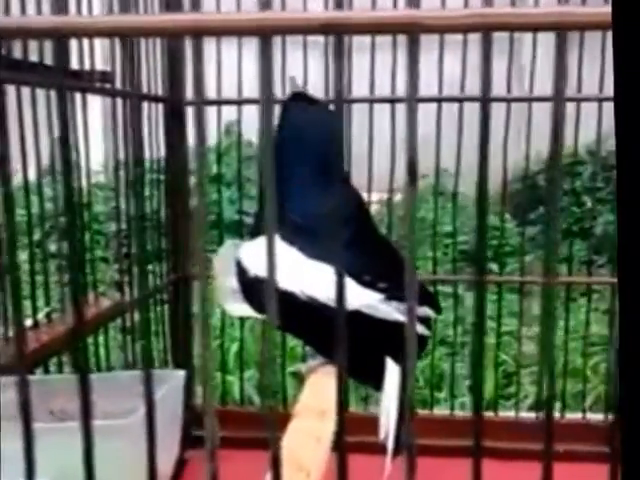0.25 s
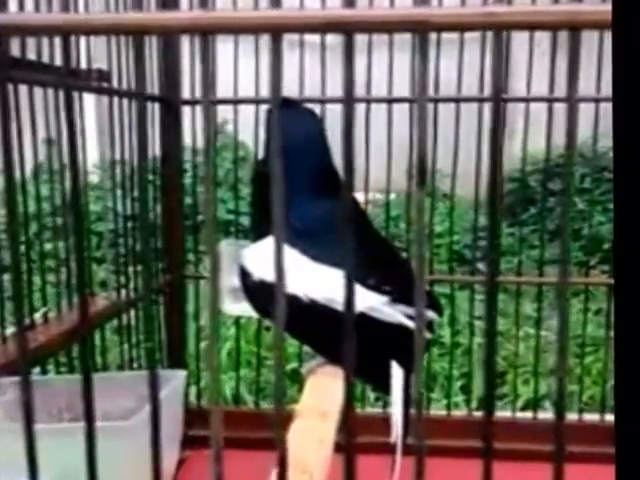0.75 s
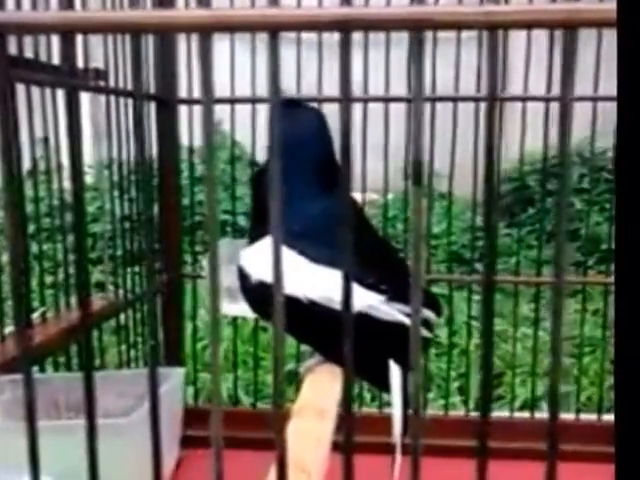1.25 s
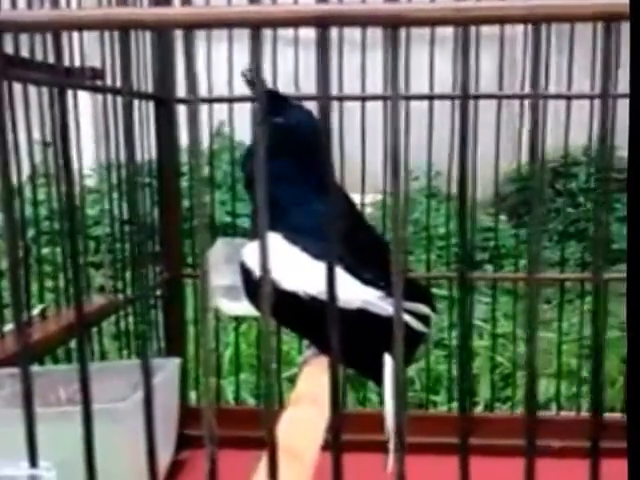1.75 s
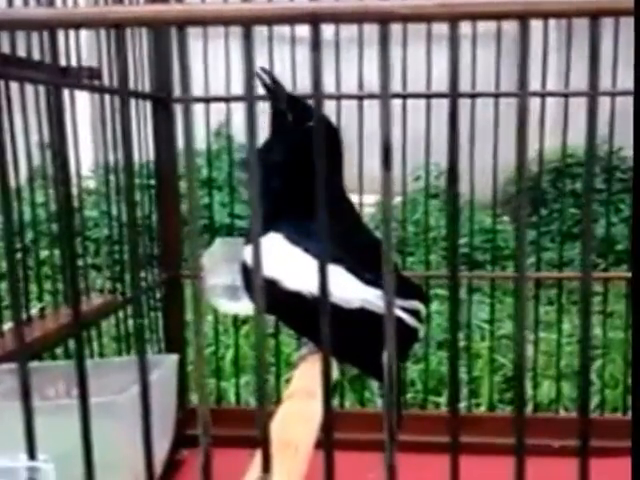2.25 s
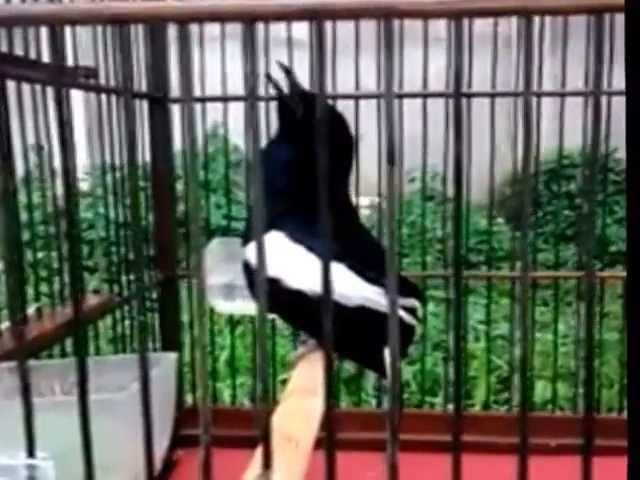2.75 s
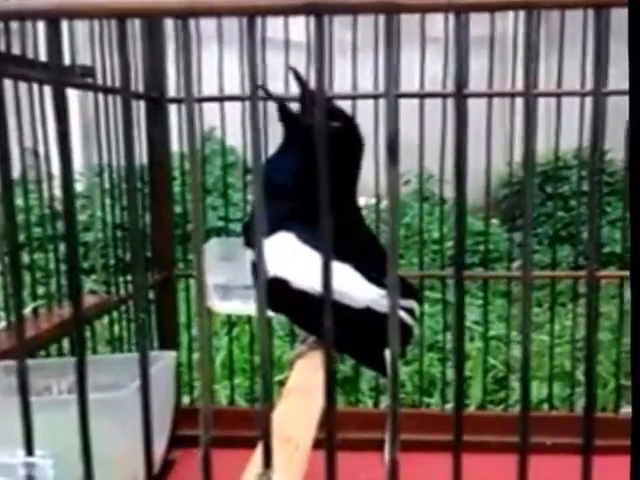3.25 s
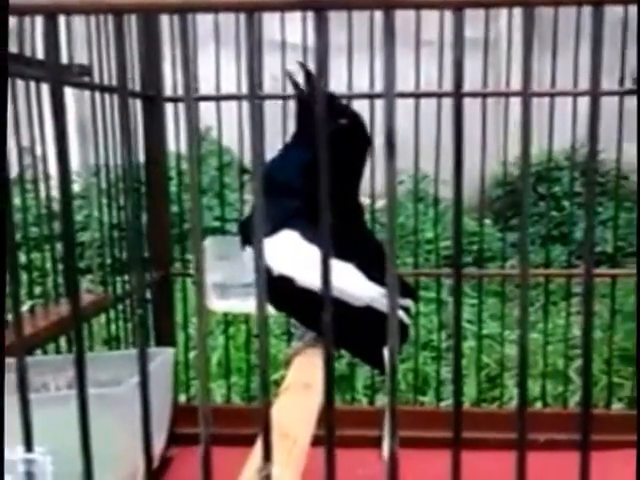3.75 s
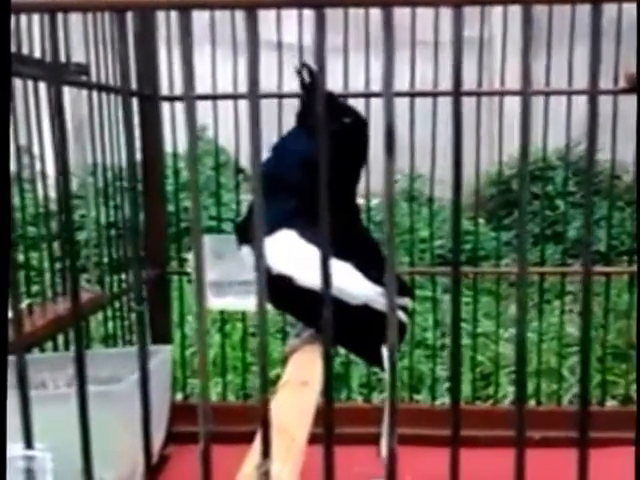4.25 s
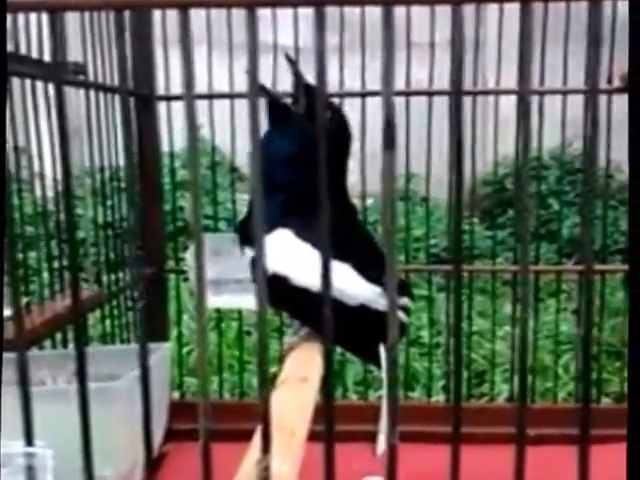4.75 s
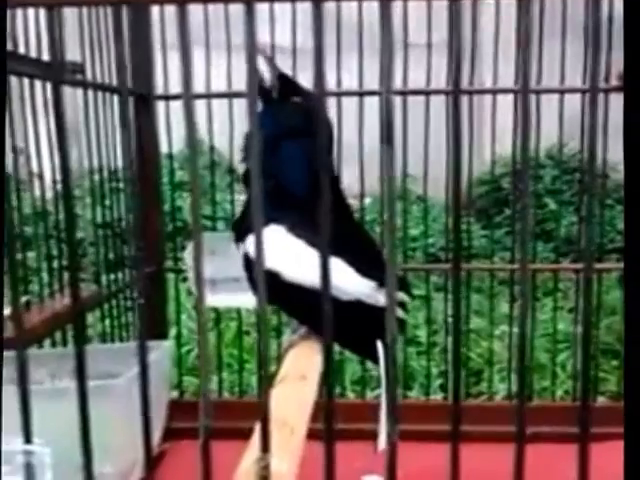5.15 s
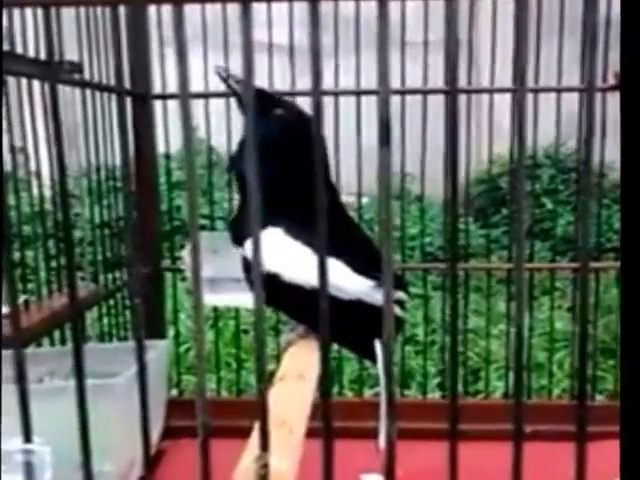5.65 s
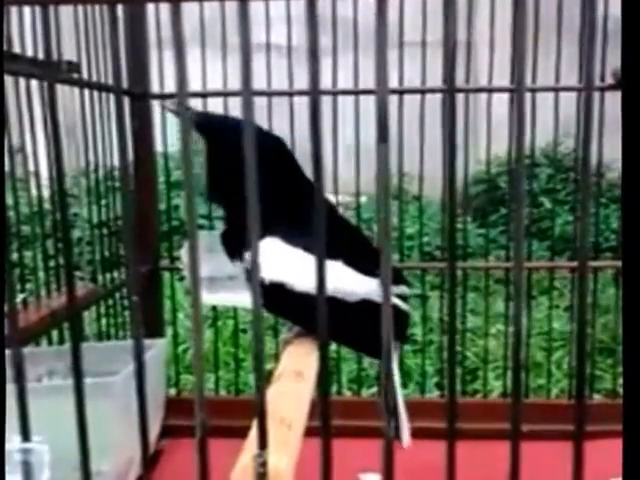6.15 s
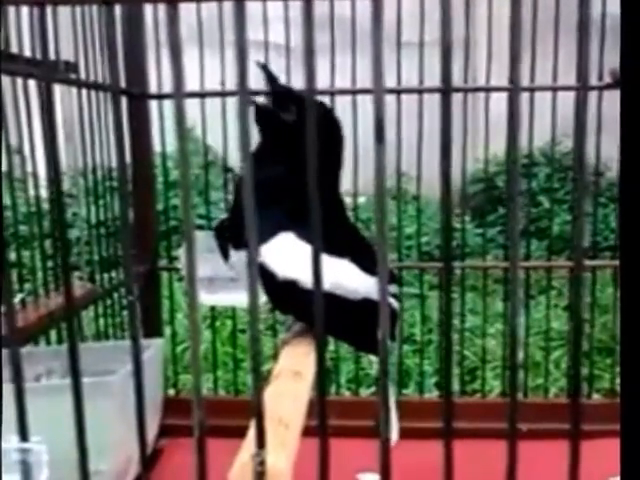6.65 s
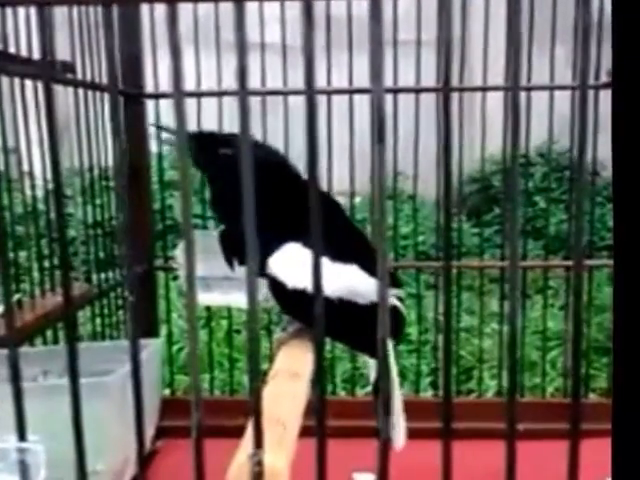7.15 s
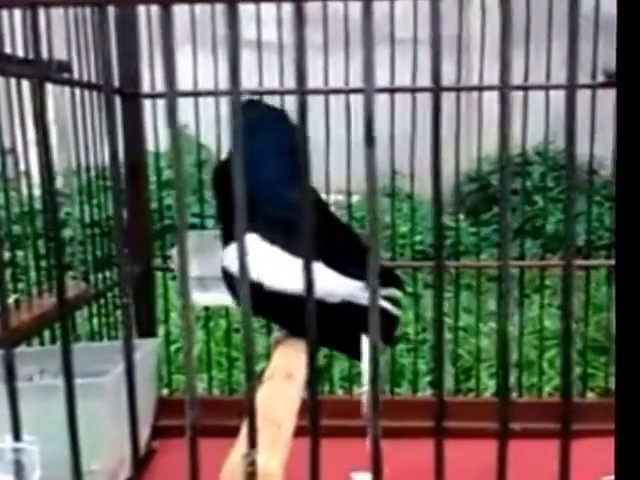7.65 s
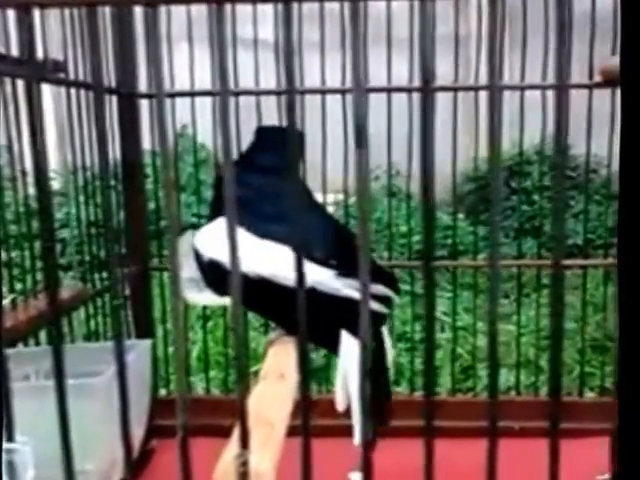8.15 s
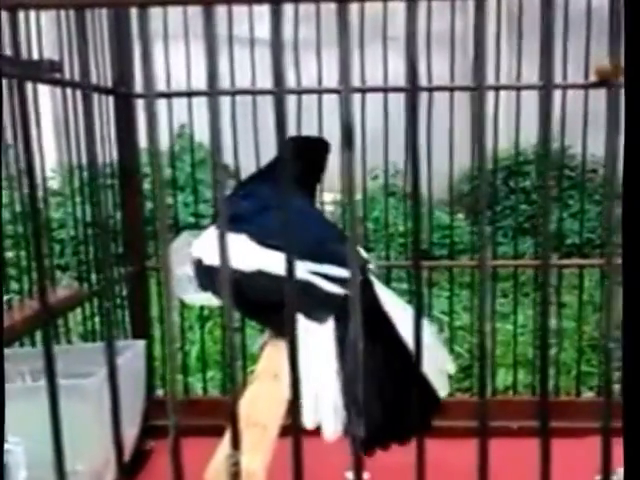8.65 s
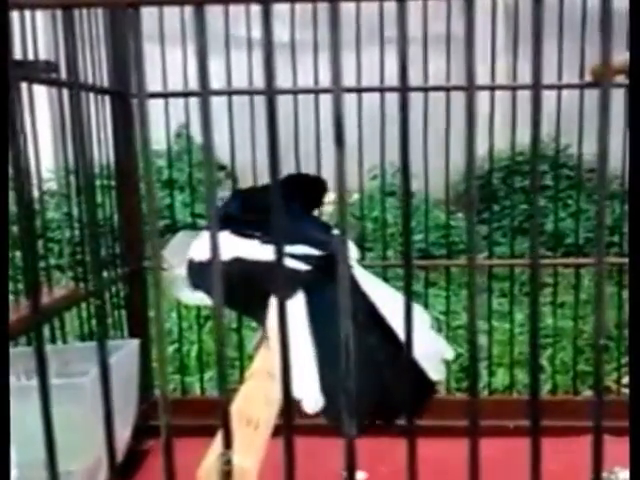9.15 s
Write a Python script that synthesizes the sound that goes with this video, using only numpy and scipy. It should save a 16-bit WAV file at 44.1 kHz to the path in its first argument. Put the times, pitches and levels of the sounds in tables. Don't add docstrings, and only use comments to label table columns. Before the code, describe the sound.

A caged songbird sings close by: clear whistles, tumbling cries, harsh chatter and quick trills, over pulsing spray hiss and faint low rumble.

```python
import sys
import numpy as np
from scipy import signal
from scipy.fft import rfft, irfft, next_fast_len
from scipy.io import wavfile
from scipy.ndimage import uniform_filter1d

SR = 44100
rng = np.random.default_rng(int(sys.argv[2]) if len(sys.argv) > 2 else 0)


def ratio(d):
    e = np.asarray(d, float) / 20
    return 10 ** e


def wav_out(sig):
    wavfile.write(sys.argv[1], SR, np.round(np.clip(np.atleast_2d(sig).T, -1, 1) * 32767).astype(np.int16))


N = 414981


def evened(x):
    return x / np.sqrt(np.mean(x ** 2) + 1e-20)


def read(points, hz):
    f, value = np.transpose(points)
    return np.interp(np.log(hz + 1), np.log(f + 1), value)


def add(mix, s, sound):
    part = mix[round(s * SR):][:len(sound)]
    part += sound[:len(part)]


def soft_edges(count, rise, fall):
    t = np.arange(count) / SR
    ramp = np.minimum(t / rise, t[::-1] / fall)
    return np.sin(np.pi / 2 * np.clip(ramp, 0, 1)) ** 2


def flutter(count, width_hz):
    settle = 500
    z = rng.standard_normal((count + settle, 2)) @ [1, 1j]
    z = signal.lfilter(*signal.butter(N=3, Wn=width_hz / SR), z)[settle:]
    return z / np.sqrt(np.mean(abs(z) ** 2))


def coloured(points):
    count = next_fast_len(N)
    spectrum = rfft(rng.standard_normal(count))
    colour = ratio(read(points, np.fft.rfftfreq(count, 1 / SR)))
    return evened(irfft(spectrum * colour, count)[:N])


# (frequency [Hz], gain [dB])
THROAT_GAIN = [(800, -36.5), (1800, 1.5), (3000, 5), (6000, -0.5), (14000, 6.5)]


def syrinx(hz, rough, width_hz):
    rough = np.clip(rough, 0, 1)
    turns = np.cumsum(hz) / SR
    out = 0
    for k, db in [(1, 0), (2, -33)]:  # (multiple of the pitch, dB)
        share = rough if k == 1 else np.maximum(rough, .75)
        steady = np.sqrt(1 - share)
        unsteady = np.sqrt(share) * flutter(len(hz), np.sqrt(k) * width_hz)
        throat_db = read(THROAT_GAIN, k * hz) - read(THROAT_GAIN, hz)
        rough_db = (k > 1) * 13 * rough
        colour = ratio(db + rough_db + throat_db) * (k * hz < 11700)
        out = out + colour * ((steady + unsteady) * np.exp(2j * np.pi * k * turns)).real
    return np.sqrt(2) * out


# (start [s], end [s], rate [per s], depth [share of pitch])
WARBLE_SPANS = [
    (1.733, 1.97, 37, 0.017),
    (5.508, 5.78, 36, 0.096),
]
# (start [s], end [s], least roughness [0-1], flutter width [Hz])
BUZZY_SPANS = [(1.72, 1.97, .65, 500), (3.46, 3.61, .85, 950), (4.03, 4.12, .85, 900),
               (5.39, 5.54, .3, 350), (7.25, 7.33, .3, 350), (5.54, 5.8, .55, 450), (6.905, 7.02, .6, 600),
               (4.22, 4.38, .12, 700), (7.95, 8.09, .08, 600), (2.3, 2.4, .1, 700), (7.63, 7.67, .5, 700),
               (7.76, 7.79, .4, 700), (8.33, 8.46, .2, 600)]


def note(rows):
    s, *columns = np.transpose(rows)
    t = np.arange(max(s[0] - .004, 0), s[-1] + 0.0083, 1 / SR)
    hz, db, rough = (np.interp(t, s, c) for c in columns)
    for start, end, rate, depth in WARBLE_SPANS:
        growth = np.clip((t - start) / 0.25, 0, 1) * (t < end + .1)
        hz = hz * (1 + depth * growth * np.sin(2 * np.pi * rate * t))
    sound = syrinx(hz, rough, np.clip(90 / (s[-1] - s[0]), 250, 800))
    for start, end, least, width_hz in BUZZY_SPANS:
        inside = uniform_filter1d(1. * (t > start) * (t < end), size=600)
        if inside.any():
            buzz = syrinx(hz, np.maximum(rough, least), width_hz)
            sound = np.sqrt(1 - inside) * sound + np.sqrt(inside) * buzz
    return t[0], ratio(db) * sound * soft_edges(len(t), 0.0047, 0.0044)


# (time [s], pitch [Hz], level [dB])
OPENING_SLURS = [
    [(.323, 2154, -30), (.343, 2171, -25), (.365, 2158, -25), (.387, 1894, -27), (.398, 1762, -34)],
    [(.556, 2990, -30), (.566, 2490, -18), (.574, 2400, -27), (.605, 2340, -25), (.645, 2537, -17.5),
     (.665, 2610, -20), (.685, 2590, -26), (.707, 2567, -25), (.721, 2553, -40)],
    [(.801, 2904, -26), (.808, 2520, -17), (.818, 2410, -23), (.852, 2297, -25), (.89, 2290, -33),
     (.97, 2251, -37), (1.042, 1949, -40), (1.198, 1727, -34), (1.268, 1755, -37), (1.332, 2122, -44)],
    [(0.925, 3136, -53), (0.979, 3265, -39), (1.031, 3200, -25), (1.059, 3147, -23), (1.081, 3042, -25),
     (1.119, 3011, -40), (1.245, 2815, -59), (1.319, 2934, -41), (1.35, 3043, -47)],
]
# (time [s], pitch [Hz], level [dB])
HELD_WHISTLES = [
    [(3.24, 2967, -39), (3.256, 2981, -25), (3.304, 3079, -25), (3.322, 2909, -29), (3.342, 2909, -30),
     (3.39, 3390, -36), (3.404, 2968, -34), (3.42, 3089, -45)],
    [(3.853, 2914, -33), (3.877, 2979, -22), (3.905, 2989, -24), (3.923, 2791, -29), (3.941, 2678, -27),
     (3.959, 2984, -28), (3.977, 2419, -38), (3.985, 2488, -41)],
    [(2.346, 3784, -20), (2.366, 3305, -19), (2.384, 2710, -25), (2.396, 2337, -34), (2.432, 1828, -41),
     (2.458, 1719, -40), (2.47, 1665, -46)],
    [(4.23, 2877, -47), (4.242, 3190, -33), (4.252, 3234, -35), (4.274, 2945, -34), (4.31, 2996, -39)],
    [(4.53, 1650, -28), (4.542, 2026, -22.5), (4.555, 2130, -25), (4.562, 2100, -31), (4.568, 2050, -24),
     (4.59, 1908, -33)],
    [(4.683, 3310, -26), (4.7, 3100, -23), (4.722, 2850, -30), (4.743, 2761, -25), (4.771, 2656, -27),
     (4.79, 2584, -38)],
    [(4.914, 3328, -40), (4.926, 3337, -30), (4.956, 3328, -19), (5.012, 3375, -20), (5.088, 3386, -27),
     (5.101, 3440, -38)],
    [(7.16, 3055, -23), (7.166, 3043, -19), (7.214, 3042, -19), (7.3, 2889, -31), (7.316, 2760, -37)],
]
# (time [s], pitch [Hz], level [dB])
VOICE_STRANDS = [
    [(4.264, 4600, -33), (4.29, 4350, -35), (4.316, 4115, -30), (4.322, 4156, -33)],
    [(4.32, 3265, -44), (4.33, 3322, -34), (4.35, 3657, -32), (4.36, 3715, -26), (4.377, 3628, -41)],
    [(4.669, 3798, -24), (4.681, 3783, -19), (4.701, 3603, -25), (4.712, 3512, -39)],
    [(7.468, 4018, -32), (7.476, 4050, -26), (7.486, 4043, -31), (7.514, 3579, -32), (7.57, 3603, -36),
     (7.605, 3655, -44)],
    [(7.644, 4500, -28), (7.664, 3850, -32), (7.69, 3830, -33), (7.718, 3810, -37), (7.732, 3800, -45)],
    [(7.768, 4480, -31), (7.79, 3805, -37), (7.812, 3620, -44), (7.83, 3600, -49), (7.86, 3850, -52)],
    [(7.96, 3754, -34), (7.97, 3668, -29), (7.986, 3620, -34), (8.026, 3879, -32), (8.07, 4031, -52),
     (8.08, 4171, -51)],
    [(8.92, 2950, -34), (8.946, 2538, -30), (8.958, 2511, -33)],
    [(2.309, 3500, -24), (2.317, 3640, -22), (2.325, 3720, -30), (2.33, 3744, -26)],
]


def sing_whistles(bird):
    for rows in OPENING_SLURS + HELD_WHISTLES + VOICE_STRANDS:
        add(bird, *note([(*row, .006) for row in rows]))


# (time [share of length], pitch [Hz], level under the peak [dB], roughness [0-1])
CRY_SHAPE = [
    (0, 3027, -15, 0.3),
    (0.113, 3044, -0.5, 0.17),
    (.33, 2950, -2, .15),
    (.42, 2600, -17, .45),
    (0.671, 1640, -23, .5),
    (.86, 1000, -27.5, .4),
    (0.999, 800, -39, .6),
]
# (time [s], length [s], peak level [dB])
LONG_CRIES = [
    (1.577, .38, -17.5),
    (5.396, .371, -17.5),
]


def sing_cries(bird):
    for s, length, db in LONG_CRIES:
        add(bird, *note(np.array(CRY_SHAPE) * [length, 1, 1, 1] + [s, 0, db, 0]))


def sung(s, length, db, from_hz, to_hz, peak, start_db, end_db, haste, rough):
    u = np.linspace(0, 1, num=24)
    glide = (1 - np.exp(-haste * u)) / (1 - np.exp(-haste))
    under_db = np.interp(u, [0, peak, 1], [start_db, 0, end_db])
    hz = from_hz + (to_hz - from_hz) * glide
    return np.transpose([s + length * u, hz, db - under_db, rough + 0 * u])


# (time [s], length [s], peak level [dB], first pitch [Hz], last pitch [Hz])
DROP_NOTES = [
    (6.831, 0.072, -15, 4450, 4290),
    (8.37, .075, -18.5, 4150, 2500),
]
SLIDE_NOTES = [
    (0.136, 0.017, -17.5, 2800, 3300),
    (1.7, .048, -31, 2750, 2520),
    (6.91, 0.091, -19.5, 3840, 3150),
    (4.49, 0.022, -27, 3300, 1750),
    (5.215, 0.079, -51, 6630, 6660),
]
PEEP_NOTES = [
    (0.166, 0.027, -17.5, 2470, 2740),
    (2.591, 0.021, -24.5, 4080, 4470),
    (6.345, .035, -46, 480, 470),
    (5.212, 0.19, -43.5, 3383, 3376),
]
HOARSE_PUFFS = [(0.002, 0.095, -42, 3890, 3970), (2.733, 0.04, -24.5, 3600, 4280),
                (2.775, 0.041, -23, 4200, 4910), (2.837, 0.039, -28.5, 5000, 5120),
                (3.471, 0.12, -21, 5650, 4330), (3.242, 0.076, -34, 5720, 6030),
                (3.857, 0.047, -31, 5900, 5810), (3.914, 0.033, -28, 5220, 5730),
                (3.949, 0.034, -32, 6050, 5960), (4.231, 0.02, -25, 4300, 6670),
                (4.248, 0.018, -27, 5200, 5350), (4.04, .066, -21, 3550, 2850),
                (2.092, .036, -31, 5900, 6100), (7.641, .03, -20, 5600, 5600),
                (7.65, .045, -30, 4500, 4200), (6.003, .036, -24, 1750, 1600),
                (6.055, .05, -29, 1700, 1650), (7.96, .11, -40, 5900, 5800), (2.35, .055, -33, 3000, 3000),
                (4.042, .066, -25.5, 5790, 6080), (5.112, 0.13, -45, 5900, 5990),
                (6.815, 0.019, -20.5, 6070, 4340), (7.461, 0.063, -26, 5340, 5360),
                (8.347, 0.024, -21, 3225, 5310), (7.767, .026, -19, 5800, 5750)]


def sing_short_notes(bird):
    drop = dict(peak=0.036, start_db=2.4, end_db=24.6, haste=3.1, rough=0.073)
    slide = dict(peak=0.44, start_db=2.2, end_db=10.3, haste=3.6, rough=0.041)
    peep = dict(peak=0.47, start_db=12.7, end_db=17.4, haste=.6, rough=0.04)
    hoarse = dict(peak=0.4, start_db=8.1, end_db=17.2, haste=1.7, rough=1.2)
    kinds = [(drop, DROP_NOTES), (slide, SLIDE_NOTES), (peep, PEEP_NOTES), (hoarse, HOARSE_PUFFS)]
    for kind, table in kinds:
        for row in table:
            add(bird, *note(sung(*row, **kind)))


# (time [s], level [dB], length [s], low pitch [Hz], high pitch [Hz])
TRILL_EVENTS = [
    (2.998, -20.5, 0.045, 2644, 3824),
    (8.614, -19.5, 0.045, 2920, 3570),
    (9.099, -24, .05, 2733, 3790),
]


def sing_trills(bird):
    for s, db, length, low_hz, high_hz in TRILL_EVENTS:
        t = np.arange(0, length, 1 / SR)
        climb = uniform_filter1d(np.minimum(1.4 * (3 * t / length % 1), 1), size=60)
        foot = low_hz + .5 * (high_hz - low_hz) * t / length
        voice = syrinx(foot + (high_hz - foot) * climb, 0.87 + 0 * t, 633)
        add(bird, s, ratio(db) * voice * soft_edges(len(t), 0.0017, 0.0095))


# (time [s], peak level [dB], length [s], pitch [Hz])
CHATTER_EVENTS = [(2.087, -24, 0.038, 1300), (2.091, -15, .04, 1750), (8.339, -21, 0.041, 2750),
                  (5.966, -34.5, 0.029, 808), (6.003, -33, 0.042, 1150), (6.052, -38, .05, 1150),
                  (6.213, -21.5, 0.051, 1315), (6.272, -17, .043, 1238), (6.34, -19.5, .04, 1327),
                  (6.452, -14.5, .043, 1291), (6.518, -17, 0.036, 1300), (6.59, -17, .042, 1243)]
# (multiple of the pitch, level [dB])
CHATTER_OVERTONES = [(1, 1.5), (1.5, 2.5), (2, 7.5), (2.5, -1), (3, -14), (4, -20), (5.5, -31),
                     (7.5, -14.5)]


def sing_chatter(bird):
    for s, db, length, hz in CHATTER_EVENTS:
        t = np.arange(0, length, 1 / SR)
        arch = 1 - 0.72 * (t / length - .55) ** 2 + .04 * flutter(len(t), 120).real
        turns = hz * np.cumsum(arch) / SR
        stack = 0
        for k in np.arange(2, 18) / 2:
            body = 0.9 / k + flutter(len(t), 130 * k)
            stack = stack + ratio(read(CHATTER_OVERTONES, k)) * (body * np.exp(2j * np.pi * k * turns)).real
        add(bird, s, ratio(db - 8) * evened(stack) * soft_edges(len(t), 0.0057, .012))


def tone(hz, s, length, start_db, end_db):
    t = np.arange(0, length, 1 / SR)
    on = np.clip(np.minimum(t, length - t) / 0.0015, 0, 1)
    level = ratio(start_db + (end_db - start_db) * t / length)
    return s, np.sqrt(2) * level * on * np.sin(2 * np.pi * hz * (s + t))


FIXED_TONE_HZ = [4687.5, 5062.5, 5437.5, 5812.5, 6187.5, 8812.5, 9562.5, 12187.5]
# (time [s], length [s], start level [dB], end level [dB])
FIXED_TONES = [
    [(2.095, .033, -30, -33), (2.318, .024, -38, -38), (2.609, .074, -22, -25), (2.683, .02, -30, -30),
     (2.703, .04, -42, -42), (2.744, .04, -28, -31), (3.967, .02, -28, -32), (4.362, .016, -33, -33),
     (7.478, .132, -27, -27)],
    [(7.656, .11, -34, -44), (7.785, .018, -29, -30), (7.821, .044, -42, -39), (7.958, .02, -26, -27),
     (8.008, .03, -27, -28), (8.038, .041, -35, -39), (8.868, .027, -18, -18), (8.895, .01, -24, -24),
     (8.905, .05, -45, -55)],
    [(.995, .043, -47, -44), (4.248, .018, -23, -25)],
    [(2.744, .015, -32, -32), (2.789, .027, -29.5, -30), (3.317, .047, -26, -33), (3.399, .03, -46, -47),
     (4.269, .011, -34, -34)],
    [(6.8, .027, -32, -36), (7.181, .13, -48, -66)],
    [(2.74, .017, -39, -41), (2.757, .027, -46, -46), (2.784, .022, -35, -41), (3.318, .047, -27, -31),
     (3.509, .09, -35, -54), (3.854, .022, -36, -36), (3.876, .022, -30, -30), (6.825, .082, -23, -34),
     (6.907, .105, -46, -61)],
    [(3.255, .022, -36, -34), (3.277, .025, -27, -27)],
    [(4.047, .043, -45, -53), (2.784, .029, -47, -47), (3.895, .037, -48, -48)],
]
# (frequency [Hz], time [s], length [s], start level [dB], end level [dB])
FAINT_FIXED_TONES = [(4687.5, .526, .083, -51, -57), (4687.5, .609, .026, -48, -48),
                     (4687.5, .635, .06, -62, -64), (4687.5, .784, .168, -55, -63),
                     (4687.5, 2.135, .078, -59, -61), (4687.5, 2.229, .05, -55, -60),
                     (5062.5, 8.08, .085, -55, -54), (5812.5, 2.822, .046, -56, -52),
                     (5812.5, 4.686, .065, -58, -58), (5812.5, 5.517, .044, -55, -59),
                     (6187.5, 1.571, .143, -50, -56), (6187.5, 7.479, .087, -58, -53),
                     (6562.5, 4.25, .02, -34, -34), (6937.5, 3.377, .025, -45, -46),
                     (6937.5, 3.64, .064, -52, -61), (6937.5, 7.493, .073, -52, -60),
                     (7312.5, 6.808, .076, -55, -60), (8812.5, 2.83, .133, -57, -63),
                     (8812.5, 3.373, .097, -57, -57), (8812.5, 3.642, .126, -50, -69),
                     (8812.5, 3.773, .08, -50, -60), (8812.5, 7.015, .19, -62, -57),
                     (8812.5, 7.224, .043, -53, -57), (9562.5, 2.619, .084, -53, -57),
                     (9562.5, 2.742, .063, -48, -50), (9562.5, 2.979, .054, -50, -54),
                     (9562.5, 3.107, .09, -54, -69), (10312.5, 3.916, .037, -49, -56),
                     (11062.5, .524, .087, -57, -60), (11062.5, 6.462, .039, -55, -58),
                     (11062.5, 6.526, .033, -56, -61), (11062.5, 7.125, .06, -55, -60),
                     (12187.5, .525, .13, -56, -63), (12187.5, 3.947, .037, -52, -55),
                     (12187.5, 8.723, .045, -52, -61), (13312.5, .633, .086, -56, -58),
                     (13312.5, 6.84, .09, -51, -60), (13312.5, 7.767, .057, -52, -64),
                     (13312.5, 7.959, .1, -57, -60), (13312.5, 1.679, .03, -59, -60)]


def fixed_tones():
    tones = np.zeros(N)
    for hz, table in zip(FIXED_TONE_HZ, FIXED_TONES):
        for row in table:
            add(tones, *tone(hz, *row))
    for row in FAINT_FIXED_TONES:
        add(tones, *tone(*row))
    return tones


# (frequency [Hz], time to fall 60 dB [s])
YARD_DECAY = [(500, 0.3), (3000, 0.55), (3900, .33), (12000, 0.35)]


def yard(x):
    taps = np.zeros((2, SR // 2))
    jitter = rng.integers(0, 20, (2, (SR // 2 - 301) // 20))
    at = np.arange(300, SR // 2 - 20, 20) + jitter
    np.put_along_axis(taps, at, rng.choice([-1., 1.], at.shape), 1)
    hz, t, z = signal.stft(taps, SR, nperseg=256)
    decay = ratio(-60 * t / read(YARD_DECAY, hz)[:, None])
    tail = signal.istft(z * decay, SR, nperseg=256)[1]
    return signal.fftconvolve(x[None], tail / np.linalg.norm(tail[0]), axes=1)[:, :N]


# (time [s], peak level [dB])
SPRAY_PULSES = [(0.42, -56), (0.53, -46), (0.7618, -42.5), (1.404, -51), (1.515, -49), (1.876, -45),
                (1.9998, -43), (2.2317, -43.5), (2.474, -42.5), (2.6, -38), (2.863, -41), (2.9846, -39.5),
                (3.1098, -43.5), (3.2362, -40.5), (3.498, -34), (3.6404, -40), (3.774, -39.5),
                (4.413, -51.5), (5.39, -48), (5.8, -50), (6.7937, -41.5), (7.03, -54), (7.1, -52),
                (7.4, -58), (7.74, -53), (7.882, -52), (7.92, -49), (8.1374, -44), (8.256, -44),
                (8.3475, -43.5), (8.4842, -44), (8.593, -43), (8.7224, -37), (8.8476, -38.5),
                (8.9794, -41.5)]
# (frequency [Hz], level [dB per Hz])
SPRAY_COLOUR = [(180, -35), (300, -17), (549, -27), (647, -27), (1110, -21), (1270, -16.5), (2030, -27.5),
                (2360, -9.5), (3110, -4), (7280, -16), (10100, -10), (14200, -30), (15000, -27.5)]


def spray():
    t, level = np.arange(SR // 2) / SR, np.zeros(N)
    decay = ratio(-60 * t / 0.18) + 0.29 * ratio(-60 * t / 1.0)
    puff = soft_edges(len(t), 0.0054, 0.36) * decay
    for s, db in SPRAY_PULSES:
        add(level, s, ratio(db + 5.0) * puff)
    return level * coloured(SPRAY_COLOUR)


# (time [s], pitch [Hz], level [dB])
DOVE_COO = [
    (1.31, 747, -50.5),
    (1.452, 689, -43),
    (1.6, 718, -56.5),
]


def dove():
    s, hz, db = np.transpose(DOVE_COO)
    t = np.arange(s[0], s[-1], 1 / SR)
    turns = np.cumsum(np.interp(t, s, hz)) / SR
    overtones = [(1, -7.5), (2, -6.5), (3, -12.0)]  # (multiple of the pitch, dB)
    stack = sum(ratio(g) * np.exp(2j * np.pi * k * turns) for k, g in overtones)
    body = (1 + 0.67 * flutter(len(t), 62)) * stack
    return s[0], np.sqrt(2) * ratio(np.interp(t, s, db)) * body.real * soft_edges(len(t), 0.031, 0.015)


# (time [s], level [dB])
RUMBLE_SWELLS = [(0.0, -42.5), (0.472, -36.5), (1.202, -53.5), (1.491, -38), (1.78, -43.5), (1.912, -40.5),
                 (2.801, -48), (3.799, -46), (4.351, -58), (4.43, -45.5), (5.191, -61), (5.369, -46),
                 (5.501, -54), (6.159, -43.5), (6.598, -50), (7.08, -45), (7.301, -48.5), (9.41, -52)]
# (frequency [Hz], level [dB per Hz])
RUMBLE_COLOUR = [(12, -41.5), (20, -0.5), (128, 8.5), (539, -18), (692, -18), (1110, -21.5), (1380, -21.5),
                 (1590, -16.5), (10200, -35.5), (15000, -35)]


def rumble():
    s, db = np.transpose(RUMBLE_SWELLS)
    lumps = ratio(3.95 * flutter(N, 35).real)
    swell = ratio(np.interp(np.arange(N) / SR, s, db))
    return swell * evened(lumps * coloured(RUMBLE_COLOUR))


def scene():
    bird = np.zeros(N)
    for sing in [sing_whistles, sing_cries, sing_short_notes, sing_trills, sing_chatter]:
        sing(bird)
    tones = fixed_tones()
    back = rumble() + spray()
    add(back, *dove())
    held = signal.lfilter([1 / 1500], [1, 1 / 1500 - 1], (bird + tones) ** 2)
    over_db = np.maximum(10 * np.log10(held + 1e-12) + 40, 0)
    back = back / ratio(.5 * uniform_filter1d(over_db, size=1500))
    echo, other = yard(bird)
    echo_gain = ratio(-16.5 - .13 * uniform_filter1d(over_db, size=600))
    mid = bird + tones + echo_gain * echo + back
    side = ratio(-24.0) * other + ratio(-27.0) * np.roll(back, SR // 7)
    return np.array([mid + side, mid - side])


def top_cut(x):
    return signal.sosfilt(signal.butter(12, 15110, fs=SR, output="sos"), x)


def record(dry):
    split_hz, copy_hz = 4310, 3750
    hz, t, z = signal.stft(dry, SR, nperseg=1024, noverlap=768)
    band_db = 10 * np.log10(uniform_filter1d(abs(z.mean(0)) ** 2, size=7, axis=0) + 1e-16)
    top_db = uniform_filter1d(band_db.max(0), size=5)
    patches = uniform_filter1d(rng.standard_normal(band_db.shape), size=8, axis=0)
    patches = evened(uniform_filter1d(patches, size=20, axis=1))
    # (Hz, dB)
    reach = [(100, 49.5), (500, 50), (2000, 28.2), (6000, 45.5), (12000, 180)]
    reach_db = read(reach, hz)[:, None] + 20.6 * patches
    reach_db = np.maximum(reach_db, 24.0)
    under_db = top_db - uniform_filter1d(band_db, size=5, axis=1) - reach_db
    kept = ratio(-30 / (1 + np.exp(-np.clip(under_db, -30, 30))))
    split, step = (round(f / hz[1]) for f in (split_hz, copy_hz))
    low = slice(split - step, split)
    z = z * kept * ratio(3.5 * np.roll(patches, step, axis=0) * (band_db < -58))
    flattened = z[:, low] * ratio(-.36 * np.maximum(band_db[low] + 72, 0))
    for k, copy_db in [(1, 4), (2, -23)]:
        high = slice(split + (k - 1) * step, split + k * step)
        holes = np.where(band_db[high] < -52, kept[low] ** (k / 4), 1)
        slope = np.linspace(0, 1, step)[:, None] ** (16 - 8 * k)
        shift = np.exp(2j * np.pi * k * step * hz[1] * t)
        z[:, high] = z[:, high] * holes + ratio(copy_db) * slope * flattened * shift
    above = slice(split + 2 * step, None)
    z[:, above] *= ratio(-2.5 + 10.2 * np.minimum(patches[above], 1))
    z[:, hz > 15000] = 0
    mix = signal.istft(z, SR, nperseg=1024, noverlap=768)[1][:, :N]
    return top_cut(mix)


dry = scene()
out = record(dry)
wav_out(out)
```